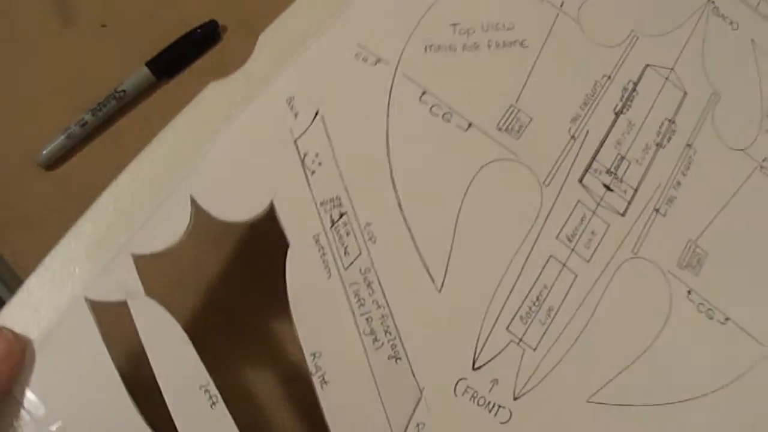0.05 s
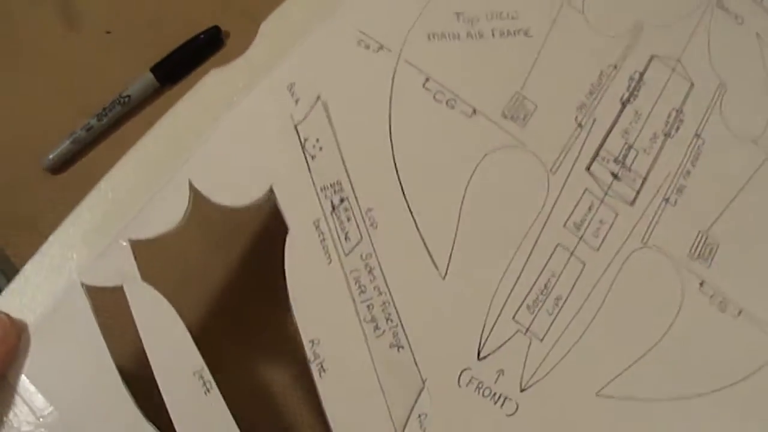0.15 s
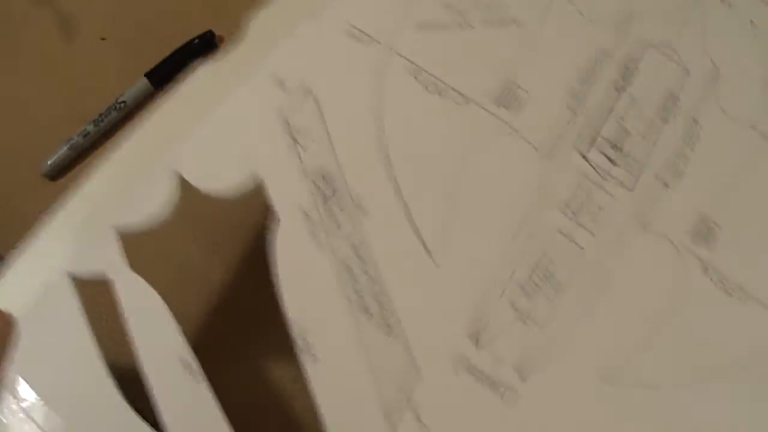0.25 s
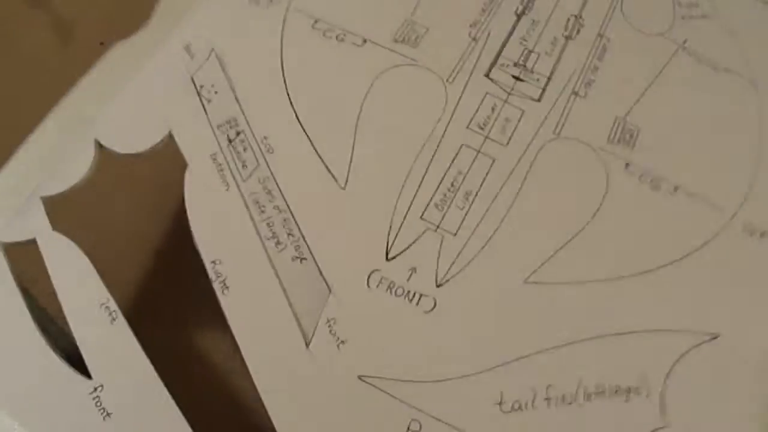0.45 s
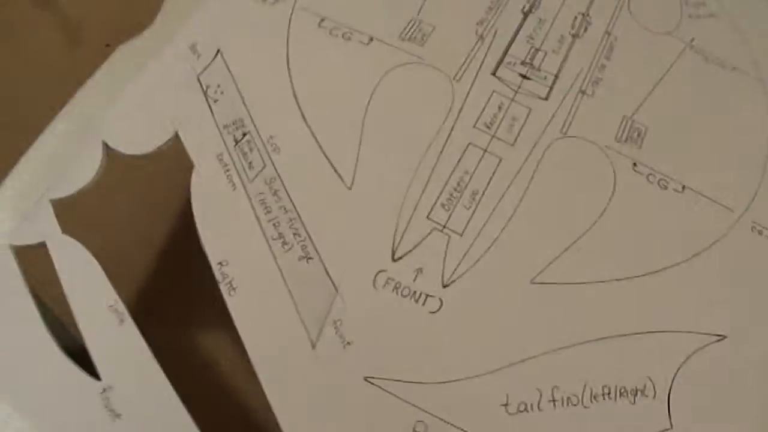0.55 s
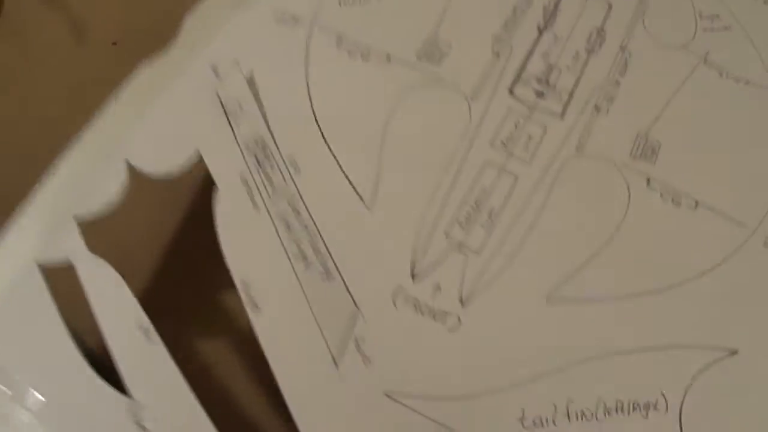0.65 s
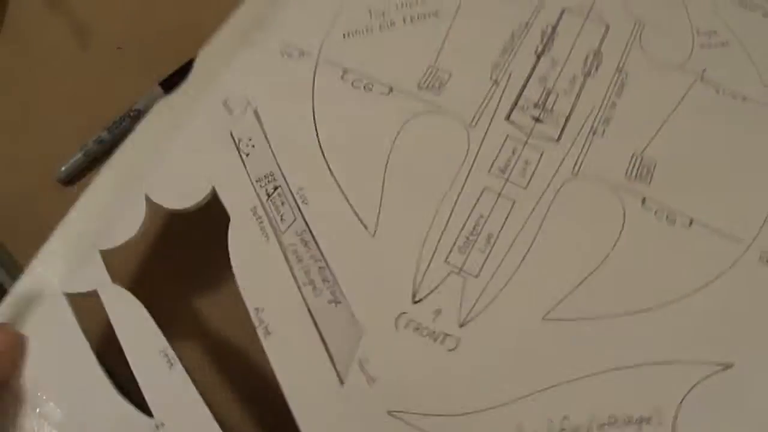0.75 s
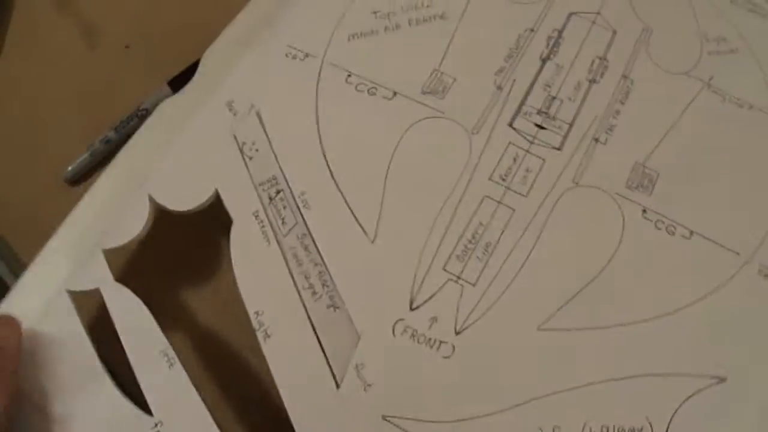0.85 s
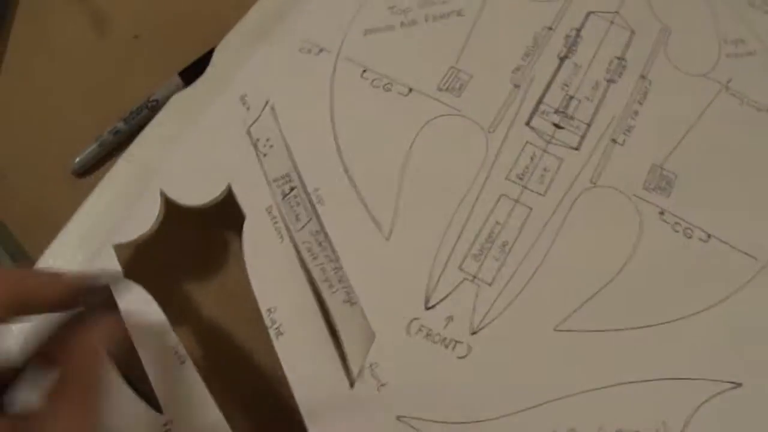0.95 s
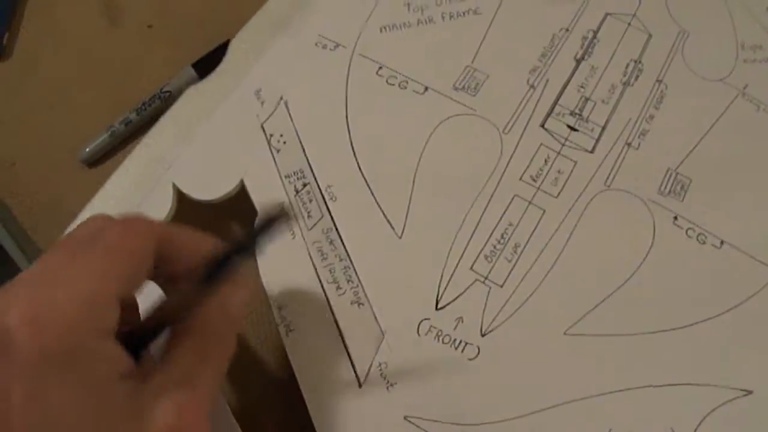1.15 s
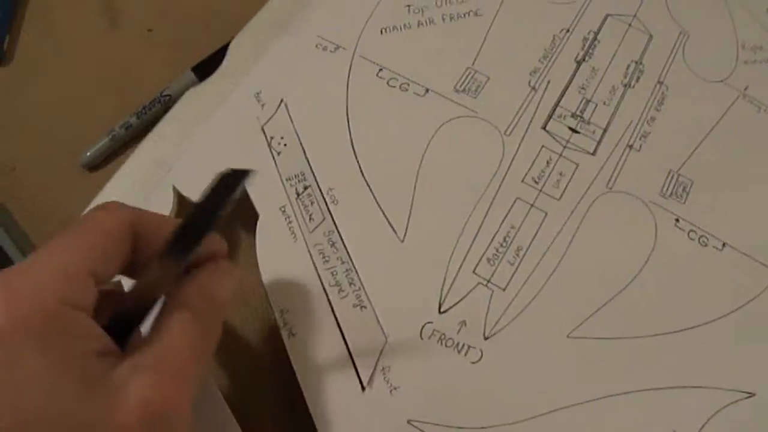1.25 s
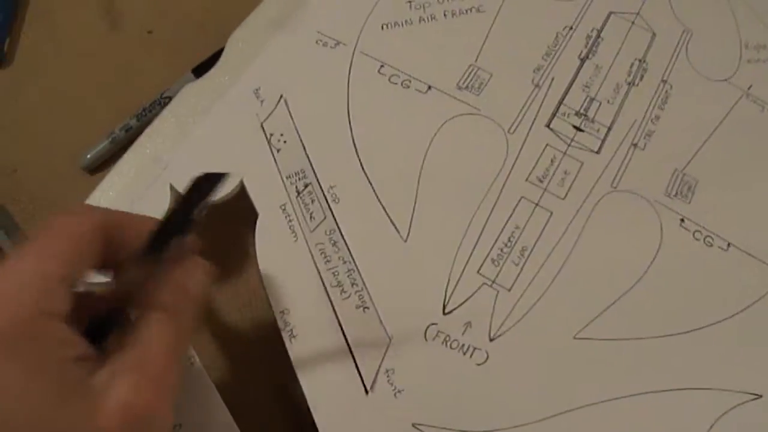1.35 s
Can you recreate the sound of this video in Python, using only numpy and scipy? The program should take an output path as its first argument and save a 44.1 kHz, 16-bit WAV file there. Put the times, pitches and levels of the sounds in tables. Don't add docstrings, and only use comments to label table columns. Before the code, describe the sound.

Light foam board being shoved over a table, with gritty scrapes, a flat slap and paper crinkles

```python
import sys
import numpy as np
from scipy import signal
from scipy.fft import rfft, irfft, next_fast_len
from scipy.io import wavfile
from scipy.ndimage import map_coordinates

SR = 44100
rng = np.random.default_rng(int(sys.argv[2]) if len(sys.argv) > 2 else 0)


def wav_out(sig):
    wavfile.write(sys.argv[1], SR, np.round(np.clip(np.atleast_2d(sig).T, -1, 1) * 32767).astype(np.int16))


def field_ratio(decibels):
    return 10 ** (np.asarray(decibels, dtype=float) / 20)


N = 61739
T = np.arange(N) / SR

# freq_hz, gain_db
ROOM_SPECTRUM = [(25, -4), (70, -13), (115, -12), (250, -11), (450, -5.5), (620, -6.5), (1350, -11.5),
                 (10800, -33.5)]
# freq_hz, width_hz, gain_db
LENS_MODES = [(4000, 800, 0), (5300, 600, -2)]
# start_s, length_s, level_db, pitch_hz
LOW_THUDS = [(0, 0.11, -60.5, 111), (0.135, 0.078, -47.5, 126), (0.197, 0.02, -46.5, 193),
             (0.275, 0.12, -57, 121), (0.433, 0.017, -39.5, 107), (0.43, 0.018, -43, 159),
             (0.431, 0.02, -31.5, 250), (0.463, 0.034, -41, 121), (0.513, 0.017, -42, 322),
             (0.54, 0.073, -54.5, 129), (0.235, 0.012, -37.5, 398), (0.658, 0.087, -63.5, 117)]
# start_s, length_s, level_db, pitch_hz, rise_hz_per_s
FOAM_SQUEAKS = [(.4402, .0035, -19.5, 1796, 9000), (.4455, .004, -25.5, 1618, 0),
                (.448, 0.0034, -26, 1930, 0), (.435, 0.0052, -26.5, 1630, 0), (.06, 0.0116, -48, 1020, 0),
                (.284, 0.0083, -31, 1100, 0), (.287, .013, -39.5, 2010, 0), (0.26, .007, -40.5, 1700, 0),
                (.352, 0.012, -36, 2900, 0), (.547, 0.0096, -36.5, 693, 0), (.764, 0.0153, -41.5, 920, 0),
                (.925, 0.011, -47, 2100, -9000), (.998, .005, -48, 3900, 0), (1.184, .016, -50, 1080, 0),
                (.158, .012, -49, 1490, 0), (.594, 0.011, -48, 3000, 0), (.804, .011, -49, 3350, 0),
                (.806, 0.01, -47.5, 5000, 0), (.454, 0.015, -36.5, 619, -7000),
                (.403, 0.0046, -33.5, 3220, 0)]
# freq_hz, gain_db
PAPER_SPECTRUM = [(710, -2), (1200, 2.5), (3360, -3), (3970, -2.5), (5730, -7.5), (7210, -14),
                  (8910, -18.5), (10800, -25), (14100, -58), (22000, -120)]
# start_s, level_db, length_s, brightness_db_per_octave
PAPER_CRINKLES = [(0.061, -51.5, 0.016, 2), (.21, -41.5, 0.0097, -1.5), (.2575, -48, .006, 6),
                  (.284, -38, .02, 4), (0.404, -35, 0.0057, 1), (.441, -29, .011, 1.5),
                  (0.529, -48, .006, 5), (.541, -40.5, 0.0065, -1.5), (.5748, -45.5, 0.0083, 1),
                  (.59, -46, .012, -1), (0.622, -50, 0.0025, 6), (0.6647, -46.5, 0.0055, -3),
                  (0.713, -46, 0.006, -4), (0.752, -55, 0.024, 10), (0.791, -41.5, 0.0075, 5),
                  (0.803, -38, 0.013, -0.5), (.8945, -55, 0.0054, 4), (.925, -41.5, 0.0092, 0),
                  (0.934, -41.5, 0.0035, 1), (0.952, -49.5, 0.0082, -5), (0.9902, -35.5, 0.0023, 1),
                  (0.9944, -37.5, 0.007, 5.5), (1.033, -50.5, 0.0044, 6), (1.074, -48.5, 0.0041, 4),
                  (1.119, -49, 0.0044, -1), (1.168, -50, 0.0051, 1), (1.18, -48, .02, 0),
                  (1.393, -54.5, 0.0029, -8)]
# start_s, peak_db, pitch_hz, rise_s
SHEET_KNOCKS = [(0.1526, -34, 800, .0008), (0.1948, -24.5, 586, 0.00042), (0.2198, -26, 805, 0.0011),
                (.2393, -16, 580, .0008), (.184, -33, 900, .0008), (0.5305, -15.5, 700, 0.00077),
                (.5888, -30, 750, .0008), (.717, -28, 700, 0.00048), (0.7338, -26.5, 800, 0.00068),
                (.7368, -21.5, 700, .0011), (0.7589, -25.5, 930, 0.0005), (0.7875, -26.5, 710, 0.00068),
                (.9919, -23, 1300, .0004), (1.2015, -35, 980, .002), (1.0895, -37, 620, .0016),
                (1.033, -37, 650, .0014), (0.3377, -25.5, 900, .0007), (0.2865, -24, 1150, .0007),
                (.228, -31, 700, .0008), (.2465, -31, 800, .0006), (1.1825, -35, 1100, .0006),
                (1.1875, -35, 1100, .0006), (0.3267, -28, 1050, 0.00059), (.7528, -27, 900, .0006),
                (0.7939, -31, 1090, 0.00046), (.805, -28, 1500, 0.00036), (.8402, -33, 900, 0.0007),
                (.929, -33, 1000, 0.00053), (.9405, -36, 800, 0.00074), (.4306, -20, 300, .0025),
                (.4372, -22.5, 420, .0018), (.356, -26, 770, 0.00099), (.368, -21.5, 800, 0.00082)]
# start_s, peak_db, pitch_hz, rise_s
FLAT_DROP = [
    (.4264, -15, 1500, .0005),
    (.4272, -5.5, 560, .0008),
    (.4289, -6.5, 560, .00047),
]
# freq_hz, gain_db
SCRAPE_SPECTRUM = [(300, -49), (1000, -1), (2000, 1.5), (3300, 4.5), (5000, -3), (7500, -11.5),
                   (11000, -21)]
# freq_hz, width_hz, gain_db
MIDDLE_MODES = [(300, 330, -8.5), (434, 92, -3.5), (620, 250, -1.5), (800, 230, -2.5)]
# freq_hz, width_hz, gain_db
EDGE_MODES = [(700, 320, -5), (973, 292, 0), (1300, 390, -2.5), (1754, 900, -8)]
# start_s, length_s, hiss_db, board_db, edge_share_0_to_1
SHOVES = [(0, 0.16, -65, -59, 0.73), (0.141, 0.026, -60, -40.5, 0.49), (0.18, 0.071, -56.5, -41, 0.66),
          (.281, .021, -36, -37.5, 0.86), (0.307, 0.077, -37, -36, .6), (0.395, 0.037, -36.5, -43, 0.83),
          (.432, .02, -34.5, -31.5, 0.4), (0.457, 0.037, -41, -40.5, 0.34), (.503, .03, -52, -45, .45),
          (.533, .007, -50, -43, .3), (0.587, 0.008, -46, -43, .8), (0.55, 0.022, -58, -59, .4),
          (0.606, 0.13, -54, -52.5, 0.33), (0.73, 0.053, -44, -37.5, 0.78), (0.791, 0.026, -61, -45, 0.67),
          (0.82, 0.042, -51, -46.5, 0.6), (0.876, 0.13, -54.5, -45.5, 0.52), (1, .053, -56.5, -49, .7),
          (1.062, 0.095, -57, -48, 0.48), (1.168, .041, -52, -48, .6), (1.214, 0.21, -63, -55.5, 0.5)]

ROOM_DB = -51
FRAME_S = 1001 / 30000
TICK_START_S, TICK_LEN_S, TICK_DB = 1.1462, 0.003, -54
GRIP_S, FADE_S = 0.0057, 0.008
TEAR_DB = -4
WALLS_DB, WALLS_DECAY_S = -16.5, 0.14
MIC_LOW_HZ, MIC_TOP_HZ = 84, 10950


def unit(x):
    return x / np.sqrt(np.mean(x ** 2) + 1e-20)


def along(points, hz):
    freq_hz, gain_db = np.transpose(points)
    return field_ratio(np.interp(np.log(hz + 1), np.log(freq_hz + 1), gain_db))


def wobble(rate_hz):
    return map_coordinates(rng.standard_normal(1000), [T * rate_hz], mode="wrap")


def filtered(x, response):
    size = next_fast_len(len(x) + 8192)
    spectrum = rfft(x, size) * response(np.fft.rfftfreq(size, 1 / SR))
    return irfft(spectrum, size)[:len(x)]


def resonant(x, modes):
    def response(hz):
        total = 0
        for k, (center_hz, width_hz, db) in enumerate(modes):
            damping = 1j * hz * width_hz
            total = total + (-1) ** k * field_ratio(db) * damping / (center_hz ** 2 - hz ** 2 + damping)
        return total
    return filtered(x, response)


def swell(start_s, length_s, attack_s, release_s):
    attack = np.clip((T - start_s) / attack_s, 0, 1)
    return attack * np.exp(-np.clip(T - start_s - length_s, 0, None) / release_s)


def grains(rate_hz, spread_db, smooth):
    chance, size = rng.random(N), rng.exponential(size=N)
    sign_noise, bed = rng.standard_normal((2, N))
    slips = (chance < rate_hz / SR) * field_ratio(spread_db * size) * np.sign(sign_noise)
    return unit(unit(slips) + smooth * bed)


def cells(count, cycles, spread_db):
    at, pitch, size = rng.random((count, 3)).T
    hz, k = 800 * 13 ** pitch[:, None], np.arange(400)
    turns = hz * k / SR
    level = hz * field_ratio(-spread_db * np.log(size[:, None] + 0.0015))
    ring = level * turns * np.exp(-3 * turns / cycles) * np.sin(2 * np.pi * turns)
    index = (at * N).astype(int)[:, None] + k
    return unit(np.bincount(index.ravel(), ring.ravel(), N + 400)[:N])


def room():
    air = filtered(rng.standard_normal(N), lambda hz: along(ROOM_SPECTRUM, hz))
    return field_ratio(ROOM_DB + 0.46 * wobble(21.5)) * unit(air)


def walls(x):
    t = np.arange(SR // 4) / SR
    tail = rng.standard_normal(len(t)) * field_ratio(-60 * t / WALLS_DECAY_S) * (t > 0.003)
    return signal.fftconvolve(x, tail / np.linalg.norm(tail))[:N]


def lens():
    gate = ((T - TICK_START_S) % FRAME_S < TICK_LEN_S) * field_ratio(1.2 * wobble(25))
    step = resonant(gate * rng.standard_normal(N), LENS_MODES)
    return field_ratio(TICK_DB) * unit(step) * np.sqrt(TICK_LEN_S / FRAME_S)


def thuds():
    out = np.zeros(N)
    for start_s, length_s, db, hz in LOW_THUDS:
        boom = unit(resonant(rng.standard_normal(N), [(hz, 0.24 * hz, 0)]))
        out += field_ratio(db) * swell(start_s, length_s, 0.003, 0.013) * boom
    return out


def squeaks():
    out = np.zeros(N)
    for start_s, length_s, db, hz, rise_hz_per_s in FOAM_SQUEAKS:
        mean_hz = hz + rise_hz_per_s * np.clip(T - start_s, 0, length_s) / 2
        turns = mean_hz * (T - start_s) + 0.14 * wobble(500)
        level = field_ratio(db + 2.0 + 3.0 * wobble(450)) * swell(start_s, length_s, 0.002, 0.0015)
        out += level * np.sin(2 * np.pi * turns)
    return out


def crinkles():
    out = np.zeros(N)
    snaps = grains(6000, 1.6, 1) + cells(count=4000, cycles=7, spread_db=2.2)
    raw = unit(filtered(snaps, lambda hz: along(PAPER_SPECTRUM, hz)))
    for start_s, db, length_s, tilt_db in PAPER_CRINKLES:
        def response(hz):
            tilt = field_ratio(tilt_db * np.log2((hz + 50) / 4000))
            return tilt / (1 + (900 / (hz + 1)) ** 4)
        burst = raw * swell(start_s, length_s, 0.001, 0.0025)
        out += field_ratio(db) * filtered(burst, response)
    return out


def knocks():
    out = np.zeros(N)
    for start_s, db, hz, rise_s in SHEET_KNOCKS + FLAT_DROP:
        t = np.clip(T - start_s, 0, None)
        pulse = t / rise_s * np.exp(-(t / rise_s) ** 2 / 2)
        out -= field_ratio(db + 4) * pulse * np.sin(2 * np.pi * hz * t)
    return out + field_ratio(-16) * resonant(out, MIDDLE_MODES)


def slide():
    shapes = np.array([swell(start_s, length_s, GRIP_S, FADE_S) for start_s, length_s, *_ in SHOVES])
    _, _, hiss_db, board_db, share = np.transpose(SHOVES)
    share = np.clip(share, 0, 1)

    foam = grains(6000, 1.8, 1) + field_ratio(TEAR_DB) * cells(count=2500, cycles=14, spread_db=2)
    hiss = unit(filtered(foam, lambda hz: along(SCRAPE_SPECTRUM, hz)))
    hiss = (field_ratio(hiss_db) @ shapes) * hiss

    slips = grains(1400, 1.8, 1)
    middle = (field_ratio(board_db) * (1 - share) @ shapes) * unit(resonant(slips, MIDDLE_MODES))
    edge = (field_ratio(board_db) * share @ shapes) * unit(resonant(slips, EDGE_MODES))

    hiss_flutter = field_ratio(0.6 * wobble(60) + 0.8 * wobble(200))
    return hiss_flutter * hiss + field_ratio(0.6 * wobble(90)) * (middle + edge)


def scene():
    near = thuds() + squeaks() + crinkles() + knocks() + slide()
    return (room() + lens() + field_ratio(WALLS_DB) * walls(near) + near)[None]


def low_pass(x):
    return signal.sosfilt(signal.butter(12, 10960, fs=SR, output="sos"), x)


def record(dry):
    x = filtered(dry[0], lambda hz: (1j * hz / (MIC_LOW_HZ + 1j * hz)) ** 2)
    x = filtered(x, lambda hz: 1 / (1 + (hz / MIC_TOP_HZ) ** 150))
    return low_pass(x[None])


dry = scene()
out = record(dry)
wav_out(out)
```